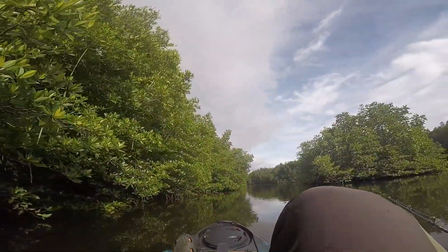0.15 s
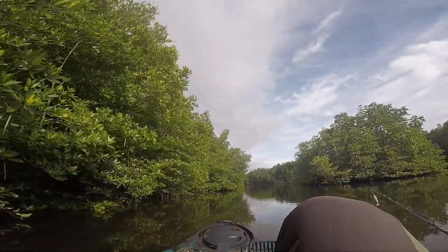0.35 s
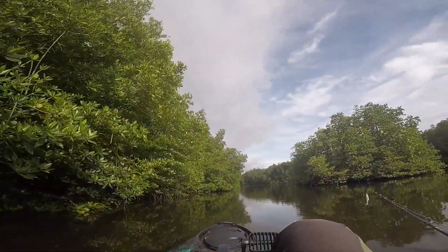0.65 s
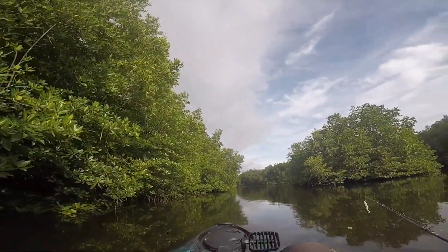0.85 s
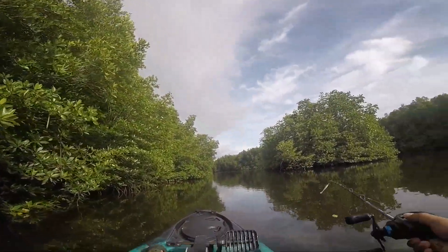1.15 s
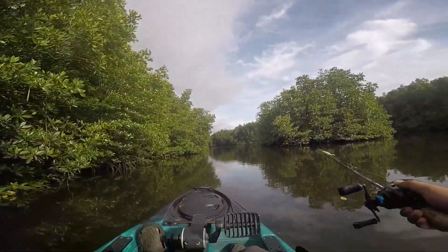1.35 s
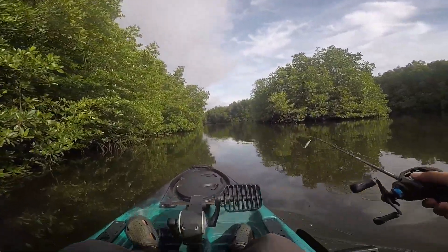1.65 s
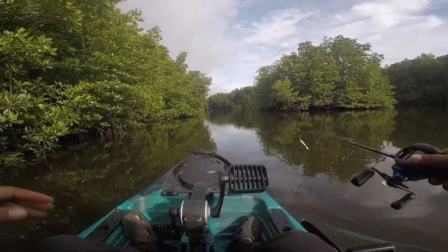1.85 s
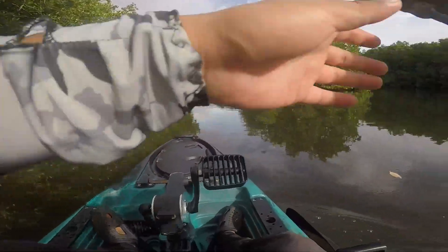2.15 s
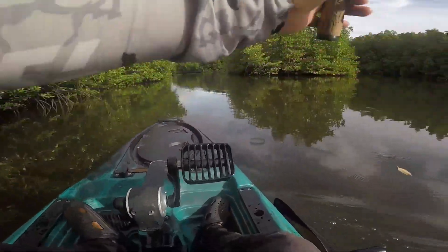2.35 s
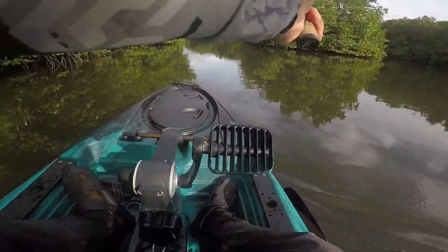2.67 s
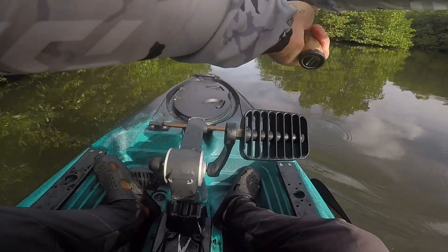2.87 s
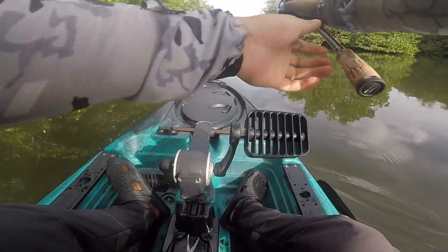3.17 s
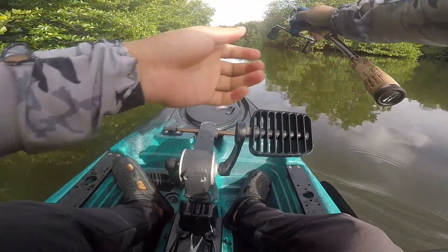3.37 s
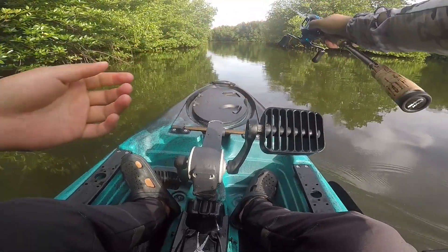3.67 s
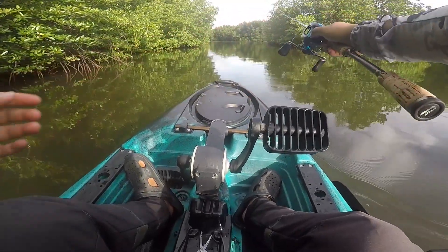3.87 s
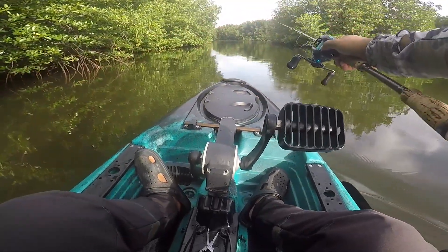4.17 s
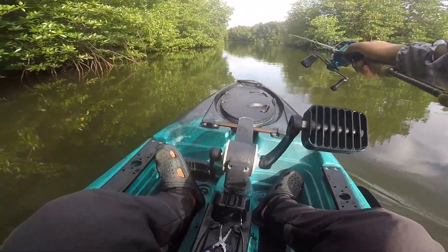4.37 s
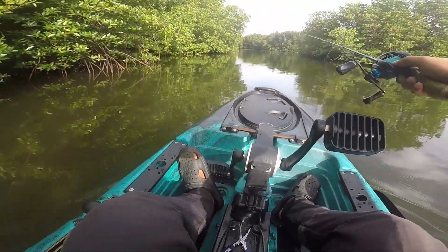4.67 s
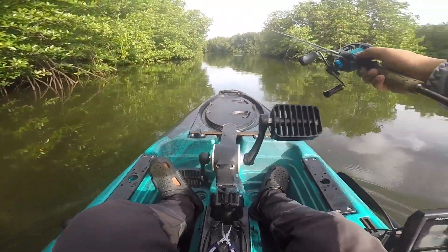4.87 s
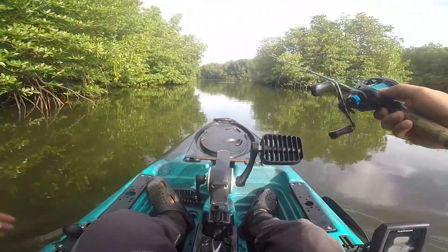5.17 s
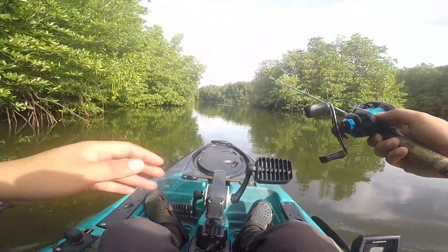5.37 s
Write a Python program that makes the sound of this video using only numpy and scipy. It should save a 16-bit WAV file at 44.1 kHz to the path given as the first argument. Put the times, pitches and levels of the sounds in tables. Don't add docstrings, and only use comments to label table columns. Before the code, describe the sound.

Throughout, a near cicada on the left gives short, rasping high buzzes about five a second, each roughly a tenth of a second, around six kilohertz with a faint airy overtone. A far, grainy chorus and faint hiss sit behind. From 0 to 1 s, muffled low bumps and rumble come through the camera mount, with faint ticks. From 1 to 2 s knocks grow denser and a sleeve begins rustling; small ticks at about 1.7 s. The rustle strengthens from 2 to 2.7 s, and the heaviest deep thumps land near 2.6 and 2.7 s with hard clicks, as the low end suddenly opens. From 2.8 to 4.2 s it is calmer: insects, lumpy low wind and small buffets, mostly right. A strong knock at 4.3 s leads to clustered thumps, creaks and cloth movement from 4.5 to 4.95 s, then lighter rustle, wind and faint ticks to 5.5 s.

```python
import sys
import numpy as np
from scipy import signal
from scipy.fft import rfft, irfft, next_fast_len
from scipy.io import wavfile
from scipy.ndimage import uniform_filter1d

SR = 44100
rng = np.random.default_rng(int(sys.argv[2]) if len(sys.argv) > 2 else 0)


def store_pcm(level_fs):
    pcm = np.round(np.clip(level_fs, -1, 1) * 32767).astype(np.int16)
    wavfile.write(sys.argv[1], SR, np.atleast_2d(pcm).T)


def attenuation_scalar(level_db):
    decades = np.asarray(level_db, float) / 20
    return 10 ** decades


N = 243502

# time in seconds, level in dB.
CHORUS_SWELL = [
    (0.0, -26),
    (0.66, -26),
    (0.98, -26.5),
    (1.15, -24),
    (1.98, -27),
    (2.43, -26),
    (2.75, -29.5),
    (2.87, -26),
    (3.83, -24.5),
    (5.52, -26),
]
# frequency in Hz, level in dB.
CHORUS_COLOUR = [(3600, -48), (4200, -33.5), (4700, -26), (5400, -14.5), (6050, -2.5), (6600, -14),
                 (7500, -20.5), (8100, -35.5), (9500, -35)]
# frequency in Hz, level in dB.
AIR_COLOUR = [(300, -3.5), (600, -0.5), (1000, -5.5), (1800, -8), (2200, -3), (2900, -9.5), (3500, -10.5),
              (3900, -6), (4400, -17)]
AIR_DB = -52.5

# first click in seconds, level in dB, length in seconds.
BURSTS = [(0.1136, -18.5, 0.12), (0.3024, -17, 0.106), (0.4977, -17, 0.114), (0.695, -18, 0.11),
          (0.8851, -16.5, 0.111), (1.0739, -17.5, 0.116), (1.2689, -16.5, 0.11), (1.4646, -14, 0.11),
          (1.6524, -14, 0.11), (1.8527, -14.5, 0.112), (2.0515, -14.5, 0.11), (2.2504, -16, 0.111),
          (2.4439, -17, 0.13), (2.6437, -13.5, 0.12), (2.8313, -16, 0.109), (3.0234, -14.5, 0.111),
          (3.2202, -17.5, 0.11), (3.4108, -18, 0.11), (3.603, -18, 0.12), (3.8011, -14.5, 0.1),
          (3.9959, -18, 0.104), (4.1828, -16.5, 0.093), (4.3734, -16, 0.099), (4.5618, -17.5, 0.108),
          (4.7553, -19.5, 0.103), (4.9313, -16.5, 0.1), (5.1229, -18, 0.087), (5.3103, -17, 0.098),
          (5.4948, -17, 0.1)]
# frequency in Hz, level in dB.
TYMBAL_COLOUR = [(3600, -45.5), (4200, -39), (4700, -32), (5400, -14.5), (6050, -7), (6600, -8),
                 (7500, -15), (8100, -30.5), (9500, -39)]
# frequency in Hz, level in dB.
OVERTONE_COLOUR = [(7000, -31), (8200, -4.5), (9800, -4.5), (11200, -5), (12200, -2), (12800, -5.5),
                   (13100, -11), (13500, -25)]
CLICKS_PER_S = 233.5
DIRECT_SHARE = 0.79

# start in seconds, length in seconds, sleeve rustle in dB, mount rumble in dB.
MOVES = [(0.01, 0.33, -72, -36), (0.234, 0.041, -62, -37), (0.471, 0.037, -57, -35.5),
         (0.78, 0.065, -55, -40), (0.921, 0.088, -46, -29), (1.022, 0.036, -45.5, -28.5),
         (1.14, 0.14, -51, -44), (1.304, 0.059, -47.5, -58), (1.402, 0.11, -48, -38),
         (1.699, 0.15, -46, -34), (1.852, 0.22, -41, -34), (2.008, 0.24, -38.5, -31.5),
         (2.268, 0.12, -38, -34.5), (2.391, 0.11, -36.5, -28), (2.553, 0.064, -33, -25),
         (2.655, 0.052, -38, -35), (2.862, 0.17, -53.5, -58), (3.508, 0.09, -53.5, -52),
         (4.18, 0.14, -51, -52), (4.47, 0.18, -45, -29.5), (4.638, 0.086, -37.5, -22),
         (4.723, 0.085, -49.5, -24), (4.862, 0.095, -38, -28.5), (5.06, 0.027, -48.5, -60),
         (5.124, 0.1, -44.5, -35.5), (5.312, 0.085, -43.5, -34.5), (5.436, 0.061, -42.5, -35.5)]
MOVE_RISE, MOVE_STOP_S = 0.3, 0.049
# time in seconds, mount rumble in dB.
AT_REST = [(0, -31.5), (.4, -41), (1.6, -37), (2.1, -32), (2.7, -34.5), (2.8, -43), (3.5, -42.5),
           (4.1, -42), (4.6, -34.5), (5.0, -43.5), (5.52, -49)]
REST_RUSTLE_DB, REST_FOLLOW = -55.5, 0.069
# frequency in Hz, level in dB.
RUMBLE_COLOUR = [(60, -24), (110, -17), (145, -13), (158, 8), (175, -4.5), (230, -6), (320, -11),
                 (430, -16.5), (520, -29.5), (800, -41)]
# frequency in Hz, level in dB.
RUSTLE_COLOUR = [(330, -6.5), (450, -13.5), (600, -5.5), (750, -1), (950, -2), (1080, -2.5), (1250, -4.5),
                 (1500, -4), (1850, -3.5), (2050, -14), (2450, -13.5), (2900, -21.5), (3450, -35.5),
                 (3800, -19.5), (4300, -31.5)]

# start in seconds, peak in dB, ring in Hz.
THUMPS = [(0.095, -22.5, 169), (0.197, -20.5, 180), (0.233, -25.5, 169), (0.491, -25, 165),
          (0.511, -19, 162), (0.774, -24.5, 204), (0.976, -17, 178), (0.998, -15.5, 200), (1.052, -22, 194),
          (1.15, -14.5, 182), (1.2, -12.5, 178), (1.239, -17.5, 207), (1.428, -12.5, 186),
          (1.46, -14, 161.6), (1.479, -27, 174), (1.521, -15.5, 179), (1.761, -12.5, 168),
          (1.781, -13.5, 175), (1.81, -14, 165), (1.884, -15, 188), (1.898, -14.5, 200), (1.936, -18, 178),
          (1.996, -12, 178), (2.164, -11.5, 190), (2.375, -8, 203), (2.563, -29, 149), (2.5876, -0.5, 99),
          (2.625, -14, 90.5), (2.687, -4, 98.5), (2.728, -19, 109.5), (4.248, -22, 171), (4.31, -7.5, 166),
          (4.529, -10, 104), (4.569, -19, 151), (4.622, -16.5, 177), (4.651, -6, 167), (4.695, -12, 116),
          (4.743, -11, 172), (4.765, -15, 175), (4.799, -26, 201), (4.905, -14, 143), (4.929, -11.5, 114),
          (5.089, -23.5, 103), (5.115, -35, 105), (5.145, -31.5, 160), (5.357, -23, 166)]
RING_CYCLES, HARD_DAMPING = 4.63, 0.32
PUSH_DB = -17.5
SLIDE, SLIDE_S = 0.92, 0.0048

# start in seconds, peak in dB, ring in Hz, t60 in seconds, bright edge in dB.
TICKS = [(0.248, -40.5, 1260, 0.054, -56), (0.99, -30, 1450, 0.014, -59), (1.048, -48, 1200, 0.012, -47),
         (1.62, -37.5, 1600, 0.038, -62), (1.719, -39, 1780, 0.017, -47), (1.737, -29, 2850, 0.018, -36),
         (1.739, -32, 4030, 0.015, -47), (2.315, -36, 1270, 0.022, -55), (2.428, -44, 1190, 0.02, -58),
         (2.569, -27, 1460, 0.042, -49), (2.588, -17, 1650, 0.038, -32.5), (2.627, -38, 1700, 0.014, -42),
         (2.647, -23.5, 1160, 0.014, -48), (2.669, -41.5, 3270, 0.026, -36), (2.678, -36, 2800, 0.03, -52),
         (2.68, -39, 2940, 0.021, -33), (2.688, -16.5, 1560, 0.012, -41), (2.794, -32.5, 1880, 0.028, -45),
         (4.241, -38.5, 1166, 0.035, -61), (3.557, -38.5, 1700, 0.042, -70), (4.308, -42, 840, 0.03, -40),
         (4.531, -38, 700, 0.025, -55), (4.76, -33, 1350, 0.015, -62), (4.78, -39, 840, 0.015, -57),
         (5.211, -35, 1440, 0.023, -62)]
# frequency in Hz, level in dB.
HOUSING_COLOUR = [(350, -16), (700, -8), (1200, 3), (1900, -1), (2800, -8.5), (3400, -20.5), (4500, -26)]

# time in seconds, level in dB, left over right in dB.
WIND_LEVEL = [(1.9, -41, 0.5), (2.3, -26.5, 2), (2.5, -38.5, 7), (2.6, -28, -13), (2.7, -28.5, 4),
              (2.81, -38.5, 0.5), (3.0, -33, 4), (3.46, -30, -4), (3.72, -29, -3), (4.05, -32.5, -3),
              (4.35, -29, -5.5), (4.51, -30.5, 3), (4.62, -26.5, 4.5), (5.15, -33.5, -4), (5.22, -31, -3),
              (5.36, -33.5, 6), (5.52, -32.5, 3)]
# frequency in Hz, level in dB.
WIND_COLOUR = [(10, 2), (30, -4), (70, -1), (120, -4.5), (200, -17), (350, -28), (600, -34.5)]
# start in seconds, peak in dB, left over right in dB (before a fixed 9 dB
# towards the right), width in seconds.
EDDIES = [
    (3.208, -27.5, -32.5, 0.0061),
    (3.661, -21.5, -3, 0.0073),
    (3.913, -23, -15, 0.0021),
    (3.989, -26.5, -19, 0.0065),
    (4.051, -23, -17, 0.0039),
    (4.229, -22, -18, 0.0039),
    (4.319, -25, -7, 0.0076),
    (4.399, -24.5, -15, 0.0042),
    (5.208, -28, -10, 0.0072),
]

# frequency in Hz, lead of the left port in radians.
PORT_LEAD = [(0, 0), (170, -0.6), (380, -2.9), (690, -3.3), (1120, -2.2), (2070, -2.1), (2580, -1.9),
             (3010, -0.2), (4740, -0.0), (5600, 1.7), (6550, 2.2), (6980, 2.5), (8180, 1.7), (9390, 3.1),
             (13200, 3.0)]
# frequency in Hz, left over right in dB.
PORT_TILT = [(60, 4), (200, 3.5), (330, 3), (480, 6), (720, 2), (2500, 0.2), (3800, 3.5), (5000, 7),
             (6000, 11), (7200, 6), (8000, -3.5), (9500, 6), (11500, 2.5), (13000, 12)]
MOUNT_LEAD = 0.48

# time in seconds, level let through below the edge in dB.
LOW_CUT = [
    (0, -35),
    (1.4, -38),
    (1.9, -32),
    (2.15, -28),
    (2.4, -26),
    (2.5, -3),
    (2.6, 0),
]
LOW_CUT_HZ = 130.6
# frequency in Hz, threshold in dB over the usual level of the bin.
GATE = [(300, -30), (600, 0), (1000, 2), (1500, 1), (2200, 3), (3000, 3), (3500, 5), (4300, 5), (4800, -30),
        (7600, -30), (8400, 2), (9400, 6), (10200, 6), (11200, -1), (12800, 4)]
GATE_WANDER_DB, GATE_BUSY = 3.5, 0.5
FRAME_LEAD = 145


def evened(x):
    return x / np.sqrt(np.mean(x ** 2) + 1e-20)


def read(points, hz):
    f, value = np.transpose(points)
    return np.interp(np.log(hz + 1), np.log(f + 1), value)


def curve(rows, axis):
    rows = np.array(rows)
    return np.interp(np.arange(N) / SR, rows[:, 0], rows[:, axis])


def add(mix, s, sound):
    part = mix[round(s * SR):][:len(sound)]
    part += sound[:len(part)]


def colour(x, points):
    hz = abs(np.fft.fftfreq(8192, 1 / SR))
    fenced = [(0, -100)] + list(points) + [(SR / 2, -100)]
    log_gain = np.log(attenuation_scalar(read(fenced, hz)))
    phase = -signal.hilbert(log_gain).imag
    taps = np.fft.ifft(np.exp(log_gain + 1j * phase)).real[:4096]
    taps = taps.reshape((1,) * (x.ndim - 1) + (-1,))
    return signal.oaconvolve(x, taps, axes=-1)[..., :N]


def slow(seconds):
    size = max(int(seconds * SR), 2)
    return evened(uniform_filter1d(uniform_filter1d(rng.standard_normal(N), size), size))


def pair(same):
    a, b = rng.standard_normal((2, N))
    same = np.clip(same, 0, 1)
    return np.array([a, same * a + np.sqrt(1 - same ** 2) * b])


def ports(x, lead=1):
    size = next_fast_len(N + SR // 10)
    hz = np.fft.rfftfreq(size, 1 / SR)
    shift = attenuation_scalar(-read(PORT_TILT, hz)) * np.exp(-1j * lead * read(PORT_LEAD, hz))
    right = irfft(rfft(x[1], size) * shift, size)[:N]
    return np.array([x[0], right])


def chorus():
    grain_db = 0.2 * slow(0.0004) + 1.08 * slow(0.07)
    level = attenuation_scalar(curve(CHORUS_SWELL, axis=1) + 1.0 + grain_db)
    return level * evened(colour(pair(0.28), CHORUS_COLOUR))


def air():
    return attenuation_scalar(AIR_DB) * evened(colour(pair(0.97), AIR_COLOUR))


def abdomen(clicks):
    t = np.arange(SR // 50) / SR
    modes = np.cos(2 * np.pi * 5910 * t) + 1.74 * np.cos(2 * np.pi * 6180 * t)
    ring = attenuation_scalar(-60 * t / 0.01) * modes
    ring[0] += 30.0
    return signal.oaconvolve(clicks, ring[None], axes=1)[:, :N]


def leaf_paths(clicks):
    u = np.arange(SR // 4) / SR
    leaves = rng.standard_normal((3, 2, len(u))) * attenuation_scalar(-60 * u / 0.1)
    leaves[:, 1] = 0.5 * leaves[:, 0] + 0.51 * leaves[:, 1]
    leaves /= np.linalg.norm(leaves[0, 0])
    sway = np.pi * 1.7 * np.arange(N) / SR
    scattered = np.zeros((2, N))
    for k, path in enumerate(leaves):
        sent = clicks * np.sqrt(2 / 3) * np.cos(sway + k * np.pi / 3)
        scattered += signal.oaconvolve(sent[None], path, axes=1)[:, :N]
    return scattered


def cicada():
    gate, direct, indirect = np.zeros(N), np.zeros(N), np.zeros(N)
    u, index = np.arange(SR // 4) / SR, np.arange(40)
    second_side = index % 2
    rows = [(0.006, -20, 0.024)] + list(BURSTS)
    share = np.clip(DIRECT_SHARE, 0, 1)
    chances = rng.standard_normal((len(rows), 3, len(index)))
    for (s, db, length), (jitter, size, rebound) in zip(rows, chances):
        at = 0.0037 + (index + 0.04 * second_side) / CLICKS_PER_S + 0.00012 * jitter
        rebound_at = at + 0.0009 + 0.0002 * rebound
        clicks = np.zeros(len(u))
        clicks[(at * SR).astype(int)] = attenuation_scalar(1.85 * size - 0.47 * second_side)
        clicks[(rebound_at * SR).astype(int)] = attenuation_scalar(2.5 * rebound - 8.5)
        rise = 0.0039 + 0.0021 * np.clip(s - 3.2, 0, 1.5)
        arch_db = -2.2 * (2 * u / max(length, 0.02) - 1.05) ** 2
        ending = np.clip((length + 0.0084 - u) / (0.003 + rise), 0, 1)
        burst = attenuation_scalar(db + arch_db) * np.clip(u / rise, 0, 1) * ending
        start = max(s - 0.005, 0)
        add(gate, start, burst)
        add(direct, start, share * burst * clicks)
        add(indirect, start, np.sqrt(1 - share ** 2) * burst * clicks)
    song = attenuation_scalar(-21.5) * evened(colour(abdomen(direct + leaf_paths(indirect)), TYMBAL_COLOUR))
    throb = 0.5 * gate + 8.5 * uniform_filter1d(direct, size=40) + attenuation_scalar(-20.5)
    overtone = attenuation_scalar(-41.0) * evened(colour(pair(0.12) * throb, OVERTONE_COLOUR))
    return song + overtone


def movement(axis, rest_db):
    power = attenuation_scalar(2 * rest_db)
    for row in MOVES:
        start, length = row[:2]
        t = np.arange(0, length + MOVE_STOP_S, 1 / SR)
        shape = np.clip(t / (MOVE_RISE * length), 0, 1) * np.clip((t[-1] - t) / MOVE_STOP_S, 0, 1)
        add(power, start, (attenuation_scalar(row[axis]) * shape) ** 2)
    return np.sqrt(power)


def rumble():
    lumps = movement(axis=3, rest_db=curve(AT_REST, axis=1)) * attenuation_scalar(2.5 + 2.07 * slow(0.012))
    creak = pair(0.95) * attenuation_scalar(2.9 * slow(0.0014))
    return evened(colour(creak, RUMBLE_COLOUR)) * lumps


def rustle():
    slip_size = attenuation_scalar(1.8 * np.minimum(rng.exponential(1, N), 5))
    slips = slip_size * (rng.random(N) < 4000 / SR)
    cloth = evened(colour(pair(0.89) * (slips + 0.27), RUSTLE_COLOUR))
    rest_db = curve(AT_REST, axis=1)
    rest_db = REST_RUSTLE_DB + REST_FOLLOW * (rest_db - rest_db.mean())
    return cloth * movement(axis=2, rest_db=rest_db) * attenuation_scalar(9.5 + 2.0 * slow(0.017))


def thumps():
    out, t = np.zeros(N), np.arange(SR // 5) / SR
    for (s, db, hz), (late, high) in zip(THUMPS, rng.random((len(THUMPS), 2))):
        t60 = (RING_CYCLES - HARD_DAMPING * db) / hz
        ring = attenuation_scalar(-60 * t / max(t60, 0.01)) * (1 - np.exp(-t / 0.002))
        slide = SLIDE * attenuation_scalar(db + 5) * SLIDE_S * (1 - np.exp(-t / SLIDE_S))
        turns = hz * (t + slide)
        higher_mode = 0.25 * np.sin(2 * np.pi * (1.563 + 0.33 * high) * turns)
        contact = 0.11 * np.sin(2 * np.pi * (350 + 80 * late) * t) * attenuation_scalar(-60 * t / 0.014)
        knock = ring * (np.sin(2 * np.pi * turns) + higher_mode) + contact
        push = attenuation_scalar(PUSH_DB) * np.sin(2 * np.pi * 60 * t) * attenuation_scalar(-60 * t / 0.42)
        add(out, s + 0.0005, attenuation_scalar(db + 5.5) * (knock - push))
        add(out, s + 0.0097 + 0.011 * late, attenuation_scalar(db - 8.0) * knock)
    return np.array([out, out])


def ticks():
    snaps, rings, edges = np.zeros(N), np.zeros(N), np.zeros(N)
    t = np.arange(SR // 14) / SR
    for (s, db, hz, t60, edge_db), noise in zip(TICKS, rng.standard_normal((len(TICKS), len(t)))):
        fade = attenuation_scalar(db - 60 * t / max(t60, 0.005))
        noise = noise + 6.0 * (t == 0)
        add(snaps, s, fade * noise * min(1, 2000 / hz) ** 2.3)
        add(rings, s, fade * np.sin(2 * np.pi * hz * t) * (1 - np.exp(-t / 0.00049)))
        add(edges, s, attenuation_scalar(edge_db - 60 * t / 0.028) * noise)
    edges = signal.sosfilt(signal.butter(2, [2600, 8500], "band", fs=SR, output="sos"), edges)
    out = attenuation_scalar(15.5) * colour(snaps, HOUSING_COLOUR) + attenuation_scalar(8.0) * rings + attenuation_scalar(17.0) * edges
    return np.array([out, out])


def wind():
    lumps = attenuation_scalar([4.64 * slow(0.09), 1.84 * slow(0.04)])
    side_db = curve(WIND_LEVEL, axis=2) * np.array([[0.5], [-0.5]])
    level = attenuation_scalar(curve(WIND_LEVEL, axis=1) + side_db + 0.5)
    out = evened(colour(pair(0.65), WIND_COLOUR) * lumps) * level
    for s, db, pan_db, width in EDDIES:
        u = np.arange(SR // 10) / SR / max(width, 0.001) - 2
        eddy = 0.5 * np.exp(-((u - 4.5) / 2.7) ** 2) - np.exp(-u ** 2)
        add(out[0], s, attenuation_scalar(db - 8.0 + pan_db / 2) * eddy)
        add(out[1], s, attenuation_scalar(db + 1.0 - pan_db / 2) * eddy)
    return out


def scene():
    through_air = cicada() + chorus() + rustle() + ticks() + air()
    through_mount = thumps() + rumble()
    return ports(through_air) + ports(through_mount, MOUNT_LEAD) + wind()


def low_cut(x):
    highs = signal.sosfilt(signal.butter(8, LOW_CUT_HZ, "high", fs=SR, output="sos"), x)
    opened = np.clip(attenuation_scalar(curve(LOW_CUT, axis=1)), 0, 1)
    return (1 - opened) * highs + opened * x


def limiter(x):
    peak_db = 20 * np.log10(uniform_filter1d(abs(x).max(0), size=60) + 1e-9)
    fall = np.arange(N) * 66.0 / SR
    over_db = np.maximum(np.maximum.accumulate(peak_db + fall) - fall + 9, 0)
    ducked = x / attenuation_scalar(0.78 * uniform_filter1d(over_db, size=80))
    return np.clip(ducked, -0.9, 0.9)


def gate_weak(x):
    turn = np.array([[1, 1], [1, -1]]) / np.sqrt(2)
    padded = np.pad(turn @ x, ((0, 0), (FRAME_LEAD, 0)))
    hz, _, z = signal.stft(padded, SR, "cosine", 2048, 1024)
    usual = uniform_filter1d(np.median(abs(z), 2), size=16, axis=1)[..., None]
    now = uniform_filter1d(abs(z), size=24, axis=1)
    busy_db = 10 * np.log10((abs(z) ** 2).sum((0, 1)) + 1e-12)
    chance = uniform_filter1d(rng.standard_normal(z.shape), size=20, axis=1)
    wander = evened(uniform_filter1d(chance, size=2, axis=2))
    shift_db = GATE_WANDER_DB * wander + GATE_BUSY * (busy_db - np.median(busy_db))
    loud = usual ** 0.45 * (0.8 * now) ** 0.55
    kept = z * (abs(z) > loud * attenuation_scalar(read(GATE, hz)[:, None] + shift_db))
    return turn @ signal.istft(kept, SR, "cosine", 2048, 1024)[1][:, FRAME_LEAD:FRAME_LEAD + N]


def band_limit(x):
    return signal.sosfilt(signal.butter(12, 13610, fs=SR, output="sos"), x)


def record(dry):
    finished = gate_weak(limiter(low_cut(dry)))
    return band_limit(finished)


dry = scene()
out = record(dry)
store_pcm(out)
```